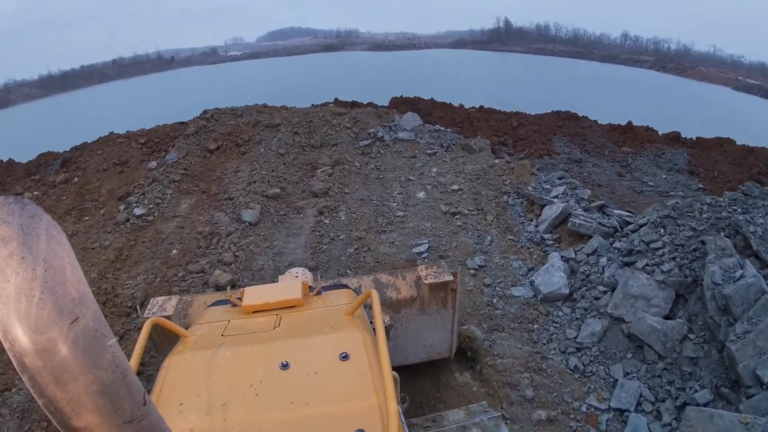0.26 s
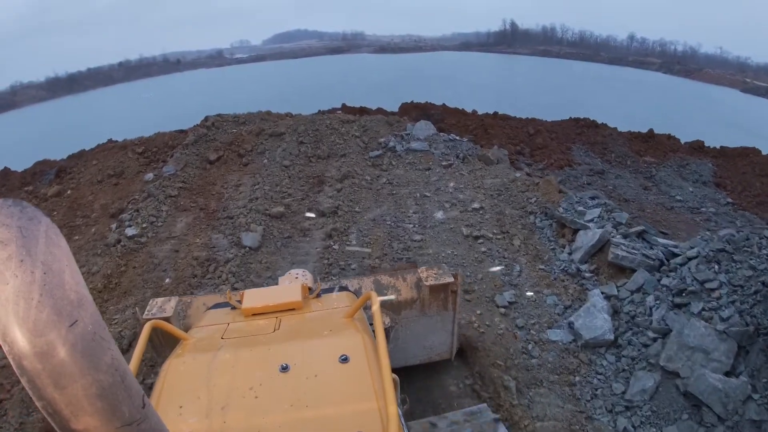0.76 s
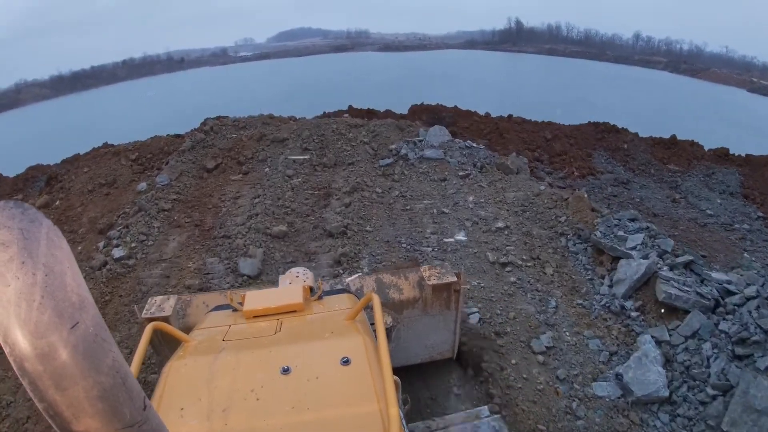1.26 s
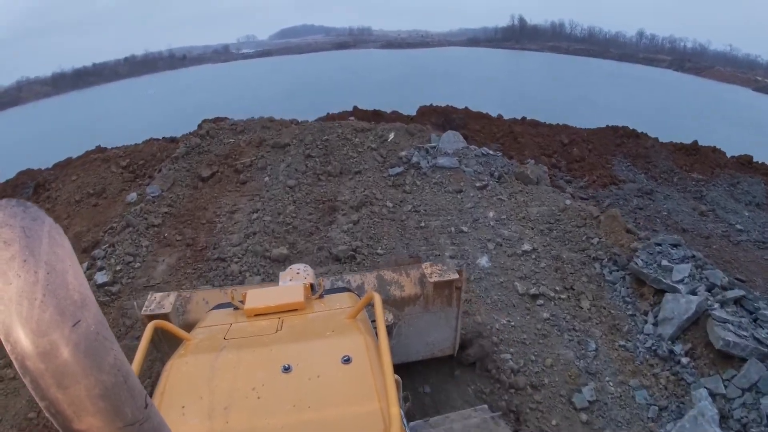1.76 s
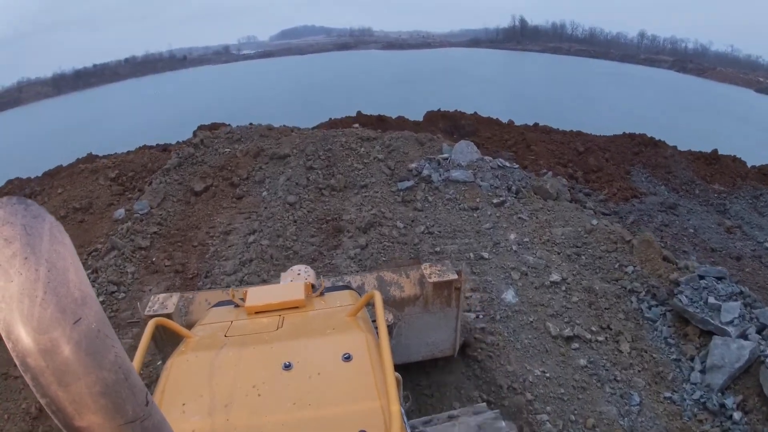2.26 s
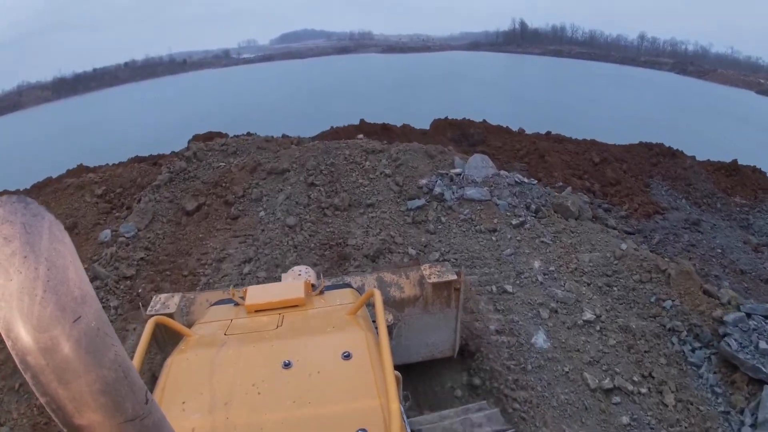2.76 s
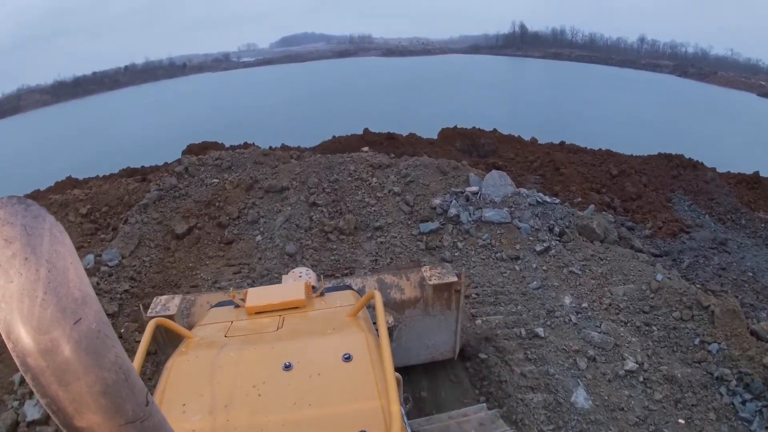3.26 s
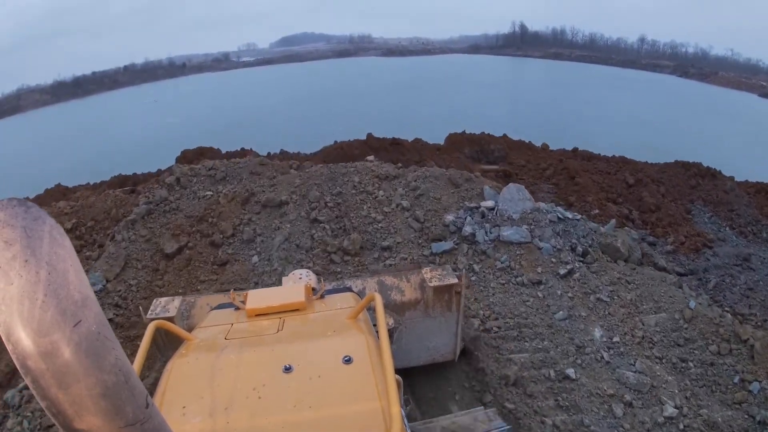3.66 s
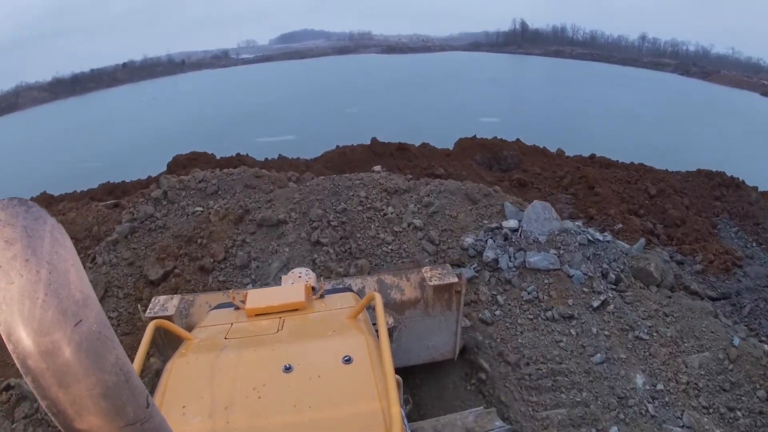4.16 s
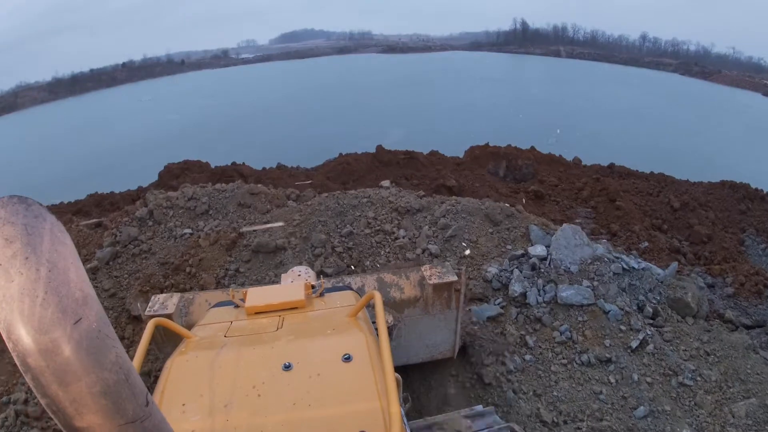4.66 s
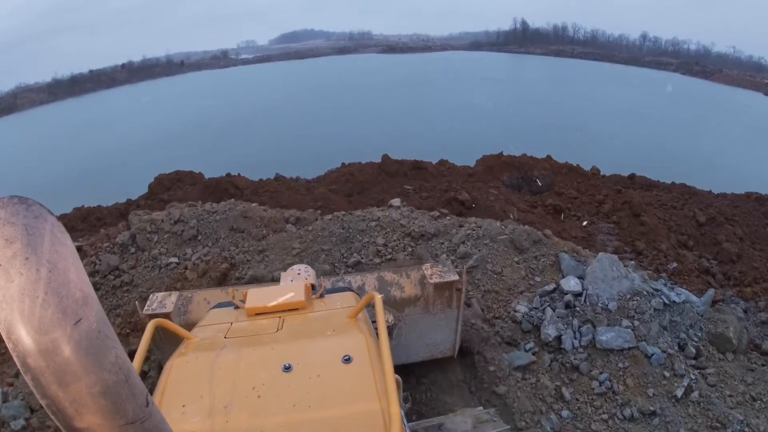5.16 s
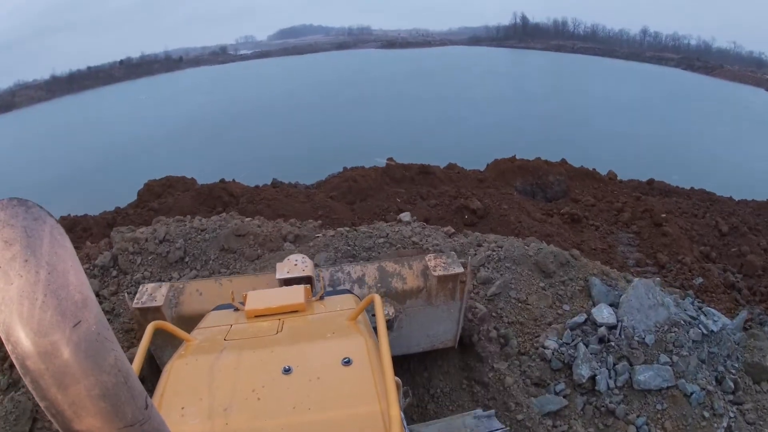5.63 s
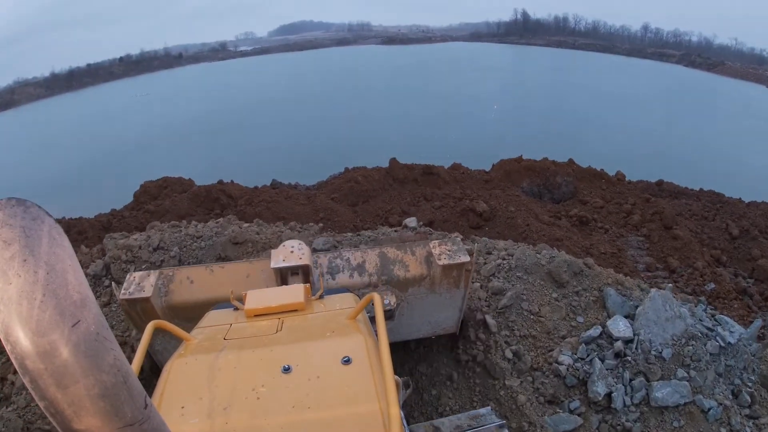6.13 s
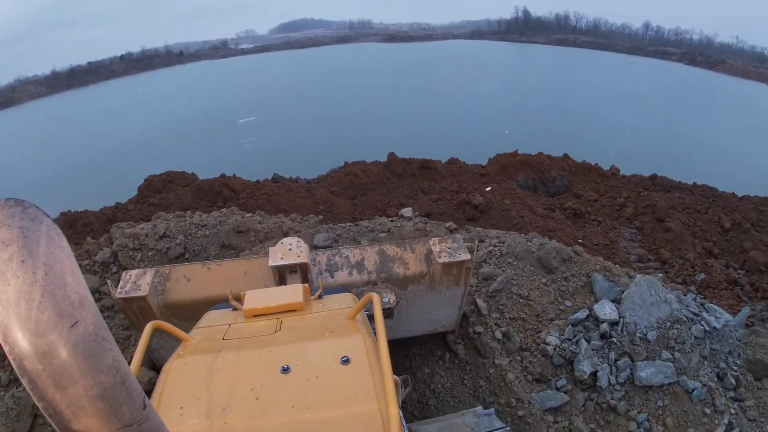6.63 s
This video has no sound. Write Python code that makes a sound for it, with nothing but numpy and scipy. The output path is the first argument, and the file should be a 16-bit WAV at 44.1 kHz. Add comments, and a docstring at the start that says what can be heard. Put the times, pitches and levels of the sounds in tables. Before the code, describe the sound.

Steady low fan drone and clattering diesel engine, rapid dull track knocks with steel clanks, rumble and faint grit crunch, ending in a strained, louder roar.

```python
"""Bulldozer pushing dirt

A bulldozer pushes dirt and rock, heard from above its hood. The fan drone and exhaust are tones locked to
the crankshaft; noise pulsed by the firing and coloured by the panels makes the clatter.
Track links knock about eight times a second as ringing blows over rattle, rumble and crunching grit.
Near the end the blade digs in: the engine lugs down, then pulls back hard with a louder, rougher roar."""
import sys
import numpy as np
from scipy import signal
from scipy.fft import rfft, irfft, next_fast_len
from scipy.io import wavfile
from scipy.ndimage import uniform_filter1d, minimum_filter1d, map_coordinates

SR = 44100
rng = np.random.default_rng(int(sys.argv[2]) if len(sys.argv) > 2 else 0)


def unload_audio(sound):
    """Save the sound as a 16-bit wav file, at the path given as the first command line argument."""
    columns = np.transpose(np.atleast_2d(sound))
    # keep every value between -1 and 1, then stretch to whole-number steps
    steps = np.round(np.clip(columns, -1, 1) * 32767)
    wavfile.write(sys.argv[1], SR, steps.astype(np.int16))


N = 303849  # samples

# the crankshaft drives everything: cylinder firings per passing fan blade
FIRINGS_PER_BLADE = .3283
# the sprocket is geared to it: fan blades passing per track link, and before the first link
BLADES_PER_LINK, FIRST_LINK_BLADES = 26.44, 3.1
# level at easy pushing [dB], and dB gained per dB of engine load
CLATTER_DB, CLATTER_GROWS = -27.5, 1.03
GRIT_DB, GRIT_GROWS = -50, 1.26
# pins and rollers rattling at a travel level of 0 dB [dB]; the share of the travel level that the grit follows
RATTLE_DB, GRIT_FOLLOWS = -21.5, .25
# the exhaust note barks under heavy load: base level [dB], load where the bark starts [dB], dB per dB beyond
NOTE_DB, BARK_LOAD_DB, BARK_GROWS = -26.5, 1.86, 1.95
# the note fades as the engine lugs: working speed [blade Hz], dB per Hz away from it
WORKING_HZ, NOTE_DB_PER_HZ = 214, 0.12
# an ordinary link: base knock and clank levels [dB]; knock scatter [dB], doubled for touch and clank
KNOCK_DB, CLANK_DB, LINK_SCATTER_DB = -8.5, -34, 0.7
# a link touches the tooth just before it seats: lead [s], level against the seating blow [dB]
TOUCH_S, TOUCH_DB = .013, -6
TOP_HZ = 14400  # band limit


def amp(db):
    """Decibels to gain."""
    return 10 ** (np.asarray(db) / 20)


def unit(x):
    """x at rms 1."""
    return x / np.sqrt(np.mean(x ** 2) + 1e-20)


def curves(rows):
    """One value per sample for each column after the time."""
    s, *cols = np.transpose(rows)
    return [np.interp(np.arange(N) / SR, s, c) for c in cols]


def wobble(rate):
    """A smooth random curve, rate knots a second."""
    knots = rng.standard_normal(int(N * rate / SR) + 4)
    return map_coordinates(knots, [np.arange(N) * rate / SR])


def filtered(x, response):
    """x times a response of frequency."""
    m = next_fast_len(N + 8192)
    return irfft(rfft(x, m) * response(np.fft.rfftfreq(m, 1 / SR)), m)[:N]


def coloured(x, spectrum, peaks=()):
    """x through a (Hz, dB) spectrum with resonant peaks, at rms 1."""
    f, db = np.transpose(spectrum)

    def response(hz):
        base_db = np.interp(np.log(hz + 1), np.log(f), db)
        lift_db = sum(gain / (1 + (2 * (hz - centre) / width) ** 2) for centre, width, gain in peaks)
        return amp(base_db + lift_db)

    return unit(filtered(x, response))


def grains(per_second, spread_db):
    """Tiny impacts at random times and of random sizes, at rms 1."""
    struck = rng.random(N) < per_second / SR
    sizes = amp(spread_db * rng.standard_normal(N))
    return unit(struck * rng.choice([-1, 1], N) * sizes)


def partial(turns, flutter_db, flutter_hz):
    """A tone of rms 1 locked to a shaft, its strength unsteady."""
    tone = np.sin(2 * np.pi * (turns + rng.random()))
    return unit(tone * amp(flutter_db * wobble(flutter_hz)))


def fan(blades, drone_db):
    """The blades chop the air into a strong, nearly pure drone with a weak octave."""
    drone = partial(blades, flutter_db=0.98, flutter_hz=35.34)
    octave = amp(-20.0) * partial(2 * blades, flutter_db=1, flutter_hz=12)
    return amp(drone_db) * (drone + octave)


def exhaust(firings, throb_db, note_db, clatter_db, orders_db=-6):
    """The muffler passes the firing rate and its octave; unequal cylinders add weaker orders."""
    # upper exhaust orders: (multiple of the firing rate, level before the orders_db trim [dB])
    orders = [(1.5, -6), (2.5, -7.5), (4, -10), (5, -4.5), (5.5, -5.5), (6, -7), (6.5, -6.5), (8.5, -11.5),
              (9, -15), (11, -16.5), (12, -14), (13, -21.5), (16, -14.5), (18, -15)]
    throb = amp(throb_db) * partial(firings, flutter_db=3.0, flutter_hz=12)
    note = amp(note_db) * partial(2 * firings, flutter_db=1.5, flutter_hz=14)
    upper = sum(amp(db) * partial(order * firings, flutter_db=2.0, flutter_hz=9) for order, db in orders)
    return throb + note + amp(clatter_db + orders_db) * upper


def clatter(firings, clatter_db, depth=0.24, sharpness=0.78, repeat=0.75):
    """Each firing shakes the block and the hood panels; part of it recurs with every six-cylinder cycle."""
    # tone of the clatter: (frequency [Hz], relative density [dB per Hz])
    clatter_tone = [(200, -30.5), (400, 2.5), (520, 0), (660, -3), (950, -1), (1200, -3), (1400, -4.5),
                    (1900, -9), (2300, -17.5), (3100, -25), (4500, -32.5), (8000, -58)]
    # resonances of the block and hood panels: (frequency [Hz], width [Hz], lift [dB])
    panels = [(582, 23, 0), (721, 40, 6.5), (861.4, 49, 7), (1020, 38, 4), (1131, 90, 5.5), (1228, 19, 5),
              (2060, 160, 2.5), (2615, 430, 4)]
    burst = unit(np.exp(sharpness * np.cos(2 * np.pi * firings)))
    cylinder = amp(2 * rng.standard_normal(6))[np.round(firings).astype(int) % 6]
    cycle = rng.standard_normal(SR // 12)
    cycle_firings = np.linspace(0, 6, len(cycle), endpoint=False)
    recurring = np.interp(firings, cycle_firings, cycle, period=6)
    drive = (rng.standard_normal(N) + repeat * recurring) * (1 + depth * burst * cylinder)
    return amp(clatter_db + .7 * wobble(20)) * coloured(drive, clatter_tone, panels)


def ring(modes, detune, attack):
    """One blow on a set of modes, each time with new pitches and strengths, at peak 1."""
    t = np.arange(SR // 10) / SR
    hz, level_db, t60 = np.transpose(modes)[:, :, None]
    pitch, size = rng.standard_normal((2, len(modes), 1))
    decay = amp(level_db + 2 * size - 60 * t / t60)
    waves = decay * np.sin(2 * np.pi * hz * np.exp(detune * pitch) * t)
    blow = waves.sum(axis=0) * (1 - np.exp(-t / attack))
    return blow / np.abs(blow).max()


def links(blades, travel_db):
    """Rows (s, knock dB, clank dB): a light touch and a knock for each passing link, and the hard blows."""
    # slack in the track: (time [s], how late the links seat [s])
    slack = [(0, .013), (.6, .011), (.85, -.002), (1.3, .002), (1.8, -.003), (2.7, 0), (2.95, .008),
             (4, .001), (5.4, .012), (6.3, .02)]
    # hard blows in the track, replacing any seating knock due then:
    # (time [s], knock peak level [dB], steel clank peak level [dB])
    hard_blows = [(.028, -5, -29), (0.098, -14, -31), (.16, -7, -31), (.257, -4.5, -42.5), (.542, -8, -32),
                  (.663, -7.5, -29.5), (1.51, -16, -24), (1.754, -5.5, -36), (1.885, -7, -31),
                  (3.248, -10.5, -27), (3.375, -5.5, -27.5), (3.62, -10.5, -33), (3.741, -10.5, -24),
                  (3.87, -8.5, -25), (4.119, -2, -30), (4.615, -9, -29), (4.863, -11, -23),
                  (5.244, -8.4, -18.5), (5.378, -5, -29), (5.706, -7.5, -37), (6.204, -7.5, -35)]
    t = np.arange(N) / SR
    due = np.interp(np.arange(FIRST_LINK_BLADES, blades[-1], BLADES_PER_LINK), blades, t)
    due = due + np.interp(due, *np.transpose(slack))
    hard_s = np.transpose(hard_blows)[0]
    rows = list(hard_blows)
    for s, chance in zip(due, LINK_SCATTER_DB * rng.standard_normal((len(due), 3))):
        knock_db = KNOCK_DB + np.interp(s, t, travel_db)
        rows.append((max(0, s - TOUCH_S), knock_db + TOUCH_DB + 2 * chance[0], CLANK_DB + TOUCH_DB))
        if np.abs(hard_s - s).min() > .04:
            rows.append((s, knock_db + chance[1], CLANK_DB + 2 * chance[2]))
    return rows


def tracks(strikes, rattle_db, seating_s=.01, seating_db=-20.5, bounce_s=.0105, rebound_db=-4):
    """Each link shudders into its seat with a dull knock and a bouncing clank; pins and rollers rattle."""
    # what the track frame rings with: (frequency [Hz], relative level [dB], t60 [s])
    frame = [(336, 2, 0.023), (416, -1, .016), (580, -6, 0.015), (730, -15.5, 0.0054), (885, -16.5, 0.018)]
    # what a steel shoe rings with: (frequency [Hz], relative level [dB], t60 [s])
    shoe = [(900, -2.5, 0.022), (1310, -3.5, 0.028), (1454, -3, 0.12), (1702, -0.5, 0.048),
            (1910, -2, 0.016), (2200, -9.5, .03)]
    # tone of the rattle and shudder: (frequency [Hz], relative density [dB per Hz])
    rattle_tone = [(30, -41.5), (115, -10.5), (165, 2), (250, 2.5), (380, 0), (450, -0.5), (540, -7.5),
                   (680, -25), (1500, -68)]
    blows = np.zeros(N + SR)
    shudder = coloured(rng.standard_normal(N), rattle_tone)
    for s, knock_db, clank_db in strikes:
        at = round(s * SR)
        knock = amp(knock_db) * ring(frame, detune=0.084, attack=0.00098)
        blows[at:][:len(knock)] += knock
        # the shoe clanks just ahead of the knock, then again more softly with it
        first = max(0, at - round(bounce_s * SR))
        for start, loss_db in ((first, 0), (at, rebound_db)):
            clank = amp(clank_db + loss_db) * ring(shoe, detune=.04, attack=0.0016)
            blows[start:][:len(clank)] += clank
        near = np.arange(max(0, at - SR // 20), min(N, at + SR // 20))
        swell = np.exp(-.5 * ((near / SR - s) / seating_s) ** 2)
        blows[near] += amp(knock_db + seating_db) * unit(swell * shudder[near])
    rattle = coloured(grains(per_second=500, spread_db=1), rattle_tone)
    return blows[:N] + amp(rattle_db) * rattle


def chassis(sway_db=1.5, jolt_s=0.026, rumble_db=5.0, thud_db=-6):
    """The chassis rumbles unevenly over the ground and thuds where it drops over a rock."""
    # rumble, louder over rough ground: (time [s], level before the rumble_db lift [dB])
    ground = [(0, -34.5), (1.3, -41), (1.95, -32.5), (2.8, -34.5), (3.45, -38), (3.7, -32), (4.35, -30.5),
              (4.75, -38.5), (5.6, -30.5), (6.89, -24.5)]
    # drops over a rock: (time [s], thud level before the thud_db trim [dB])
    jolts = [(1.87, -19.5), (5.4, -22), (6.08, -18), (6.72, -19)]
    # tone of rumble and thuds: (frequency [Hz], relative density [dB per Hz])
    rumble_tone = [(6, -24.5), (25, -2), (48, 0.5), (70, -0.5), (100, -3), (150, -5), (300, -27.5),
                   (900, -76)]
    ground_db, = curves(ground)
    t = np.arange(N) / SR
    thuds = sum(amp(db + thud_db) * np.exp(-.5 * ((t - s) / jolt_s) ** 2) for s, db in jolts)
    rumble = amp(ground_db + rumble_db + sway_db * wobble(7))
    return (rumble + thuds) * coloured(rng.standard_normal(N), rumble_tone)


def soil(grit_db):
    """Stones and sand crunch under the shoes and scrape along the blade: random grains over steady noise."""
    # tone of the grit: (frequency [Hz], relative density [dB per Hz])
    grit_tone = [(1500, -15), (3000, -0.5), (4100, -1), (4750, 2.5), (5400, -2.5), (6300, -4), (7000, -9.5),
                 (8500, -15), (10000, -30), (12200, -30), (14000, -40.5)]
    crunch = grains(per_second=1500, spread_db=4.0) * amp(2.7 * wobble(25))
    scrape = rng.standard_normal(N)
    return amp(grit_db + 0.46 * wobble(16)) * coloured(scrape + .7 * crunch, grit_tone)


def scene(drone_waver_db=0.76):
    """One crankshaft drives the fan, cylinders and tracks; the load drives clatter, exhaust and grit levels."""
    # the crankshaft's speed: (time [s], fan blade rate [Hz])
    speed = [(0.0, 206.9), (0.3, 201.4), (0.75, 219.6), (1.2, 214.0), (2.2, 213.4), (2.45, 209.0),
             (2.7, 214.2), (3.3, 216.4), (3.78, 209.9), (4.4, 215.5), (4.85, 213.7), (5.25, 205.3),
             (5.4, 196.0), (5.58, 168.0), (5.9, 205.8), (6.08, 217.0), (6.4, 204.4), (6.89, 191.5)]
    # fan drone before its waver: (time [s], level [dB])
    fan_level = [(0, -13.5), (.48, -15.5), (.62, -10), (1.55, -11.5), (2.6, -12), (3, -10.2), (3.53, -11),
                 (3.68, -16.5), (3.9, -15), (4.05, -12.5), (4.72, -13.5), (4.89, -10), (5.02, -19),
                 (5.23, -15), (5.44, -29.5), (5.58, -20), (5.74, -31.5), (6.02, -16), (6.3, -30.5)]
    # engine load against easy pushing: (time [s], level [dB])
    load = [(0, -0.1), (1.6, 0), (3.45, -1.27), (4.5, 2.5), (5.05, 0.9), (5.66, 0.2), (6.05, 5.5),
            (6.4, 4.5), (6.89, 2.5)]
    # firing throb, swelling and fading: (time [s], level [dB])
    throb = [(0, -40.5), (.8, -41.5), (1.55, -32.5), (2.1, -41.5), (3.7, -43.5), (4.35, -27), (5.15, -34),
             (5.41, -22), (5.6, -31.5), (6.5, -30), (6.89, -36)]
    # how hard the tracks run, easing off at the end: (time [s], level [dB])
    travel = [(0, -1.2), (1.7, 1.4), (2.75, -1), (3.4, .5), (3.8, -3), (4.25, 0), (5.4, -1.5), (6.2, -5),
              (6.89, -8.5)]
    blade_hz, = curves(speed)
    drone_db, = curves(fan_level)
    load_db, = curves(load)
    throb_db, = curves(throb)
    travel_db, = curves(travel)

    blades = np.cumsum(blade_hz * (1 + .003 * wobble(25))) / SR  # blades passed so far
    firings = FIRINGS_PER_BLADE * blades
    bark_db = BARK_GROWS * np.maximum(0, load_db - BARK_LOAD_DB)
    note_db = NOTE_DB + bark_db + NOTE_DB_PER_HZ * (blade_hz - WORKING_HZ)
    clatter_db = CLATTER_DB + CLATTER_GROWS * load_db
    grit_db = GRIT_DB + GRIT_GROWS * load_db + GRIT_FOLLOWS * travel_db

    engine = fan(blades, drone_db + drone_waver_db * wobble(11))
    engine = engine + exhaust(firings, throb_db, note_db, clatter_db)
    engine = engine + clatter(firings, clatter_db)
    running_gear = tracks(links(blades, travel_db), RATTLE_DB + travel_db) + chassis()
    return (engine + running_gear + soil(grit_db))[None]


def limiter(x, ceiling):
    """Peaks over the ceiling push the whole sound down for a few hundredths of a second."""
    needed = np.minimum(1, ceiling / (np.abs(x) + 1e-9))
    held = minimum_filter1d(needed, size=SR // 35, origin=SR // 80)  # mostly looks back, so the dip lingers
    return x * uniform_filter1d(held, size=SR // 250)


def record(dry):
    """The camera limits the peaks, then a steep low-pass removes the top of the band."""
    limited = limiter(dry[0], ceiling=.75)
    low_pass = signal.ellip(10, .1, 90, TOP_HZ, fs=SR, output="sos")
    return signal.sosfilt(low_pass, limited)[None]


dry = scene()
out = record(dry)
unload_audio(out)
```